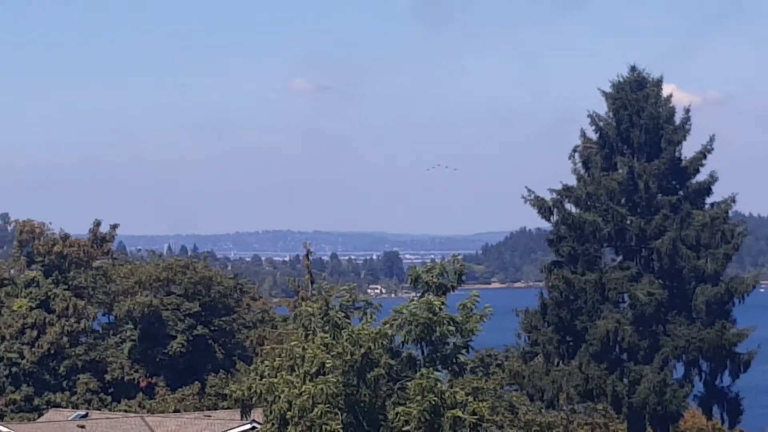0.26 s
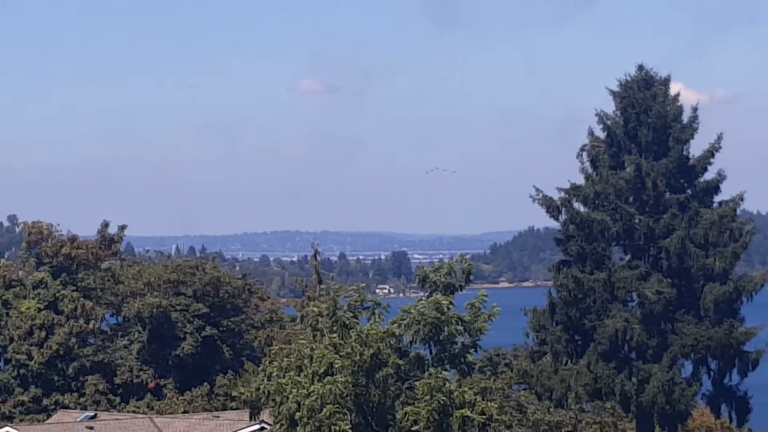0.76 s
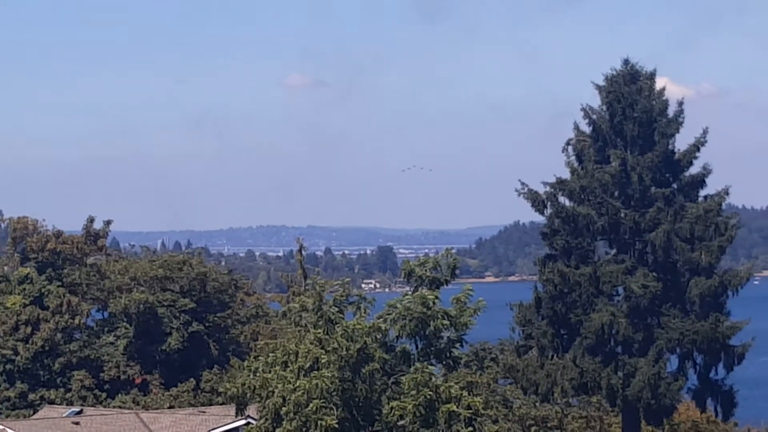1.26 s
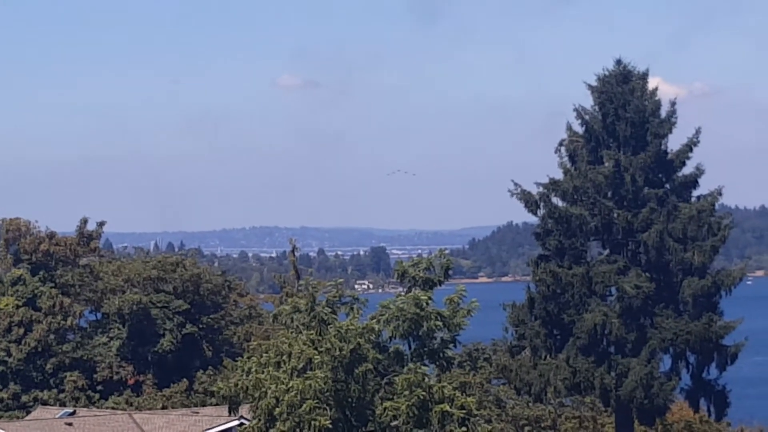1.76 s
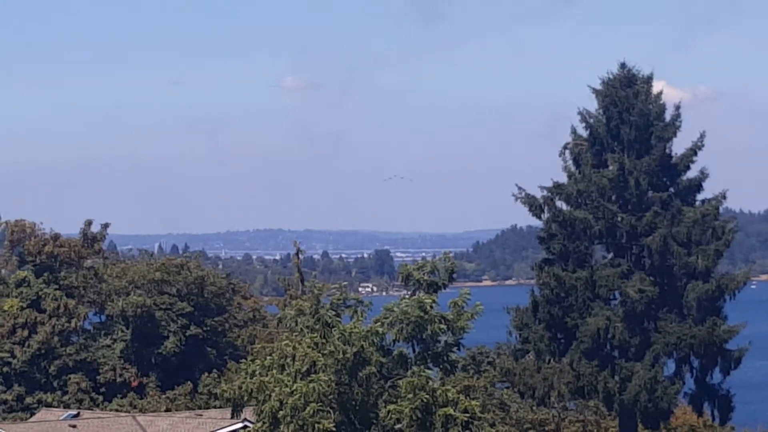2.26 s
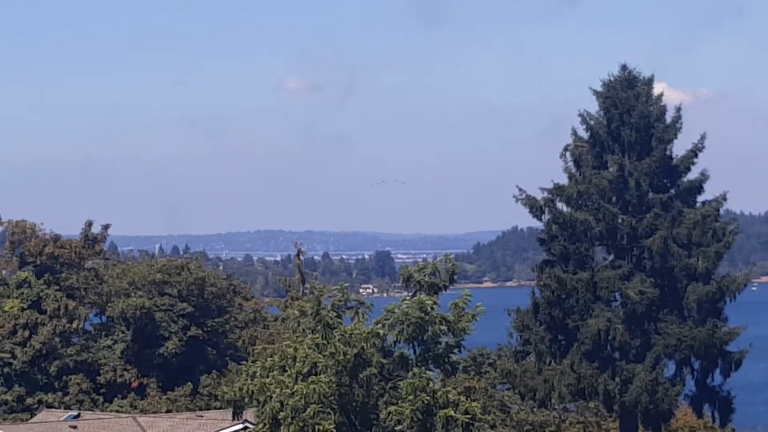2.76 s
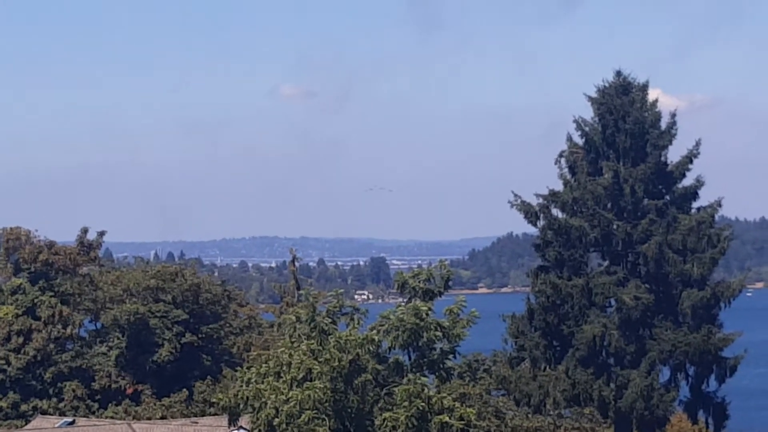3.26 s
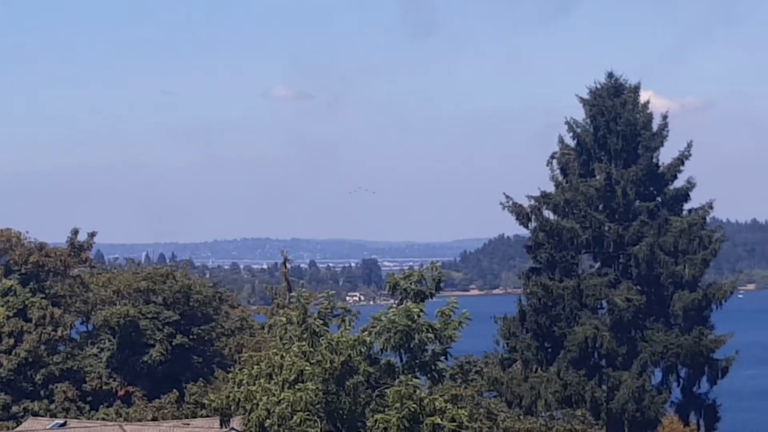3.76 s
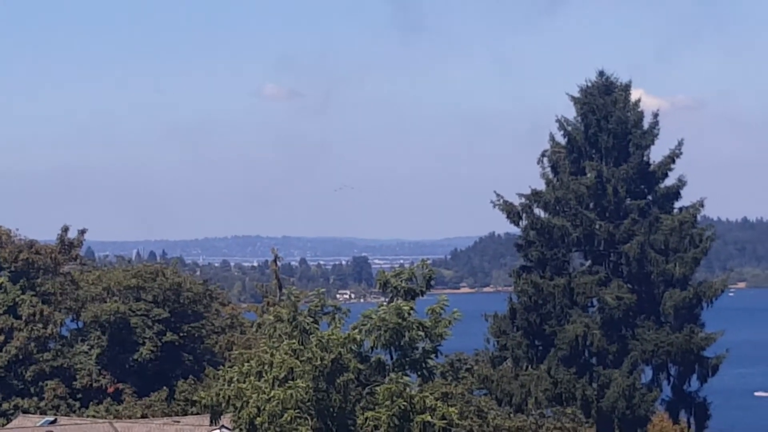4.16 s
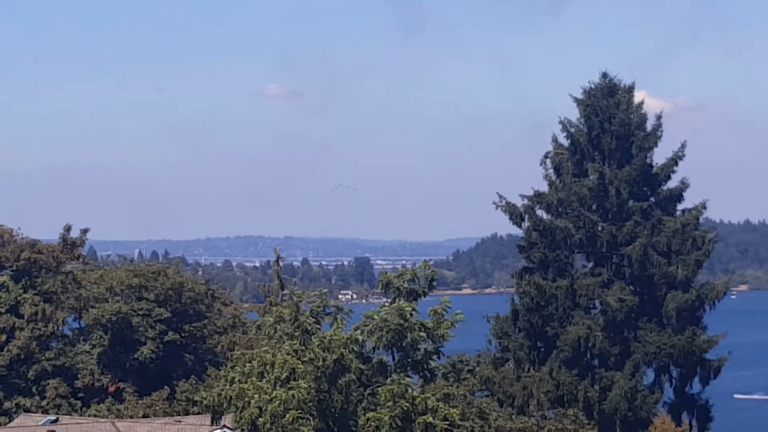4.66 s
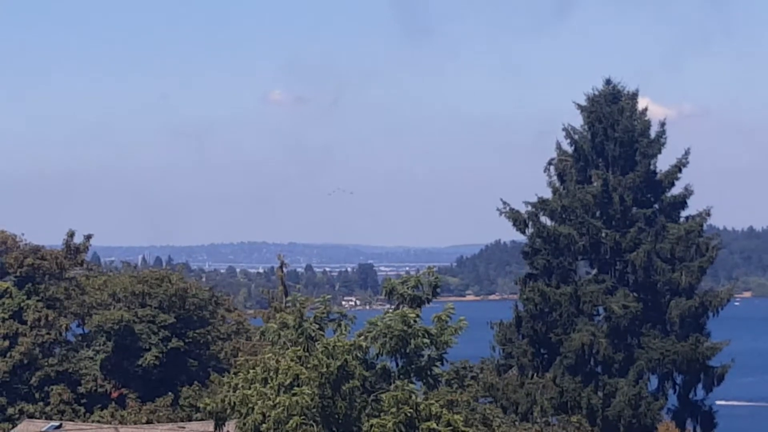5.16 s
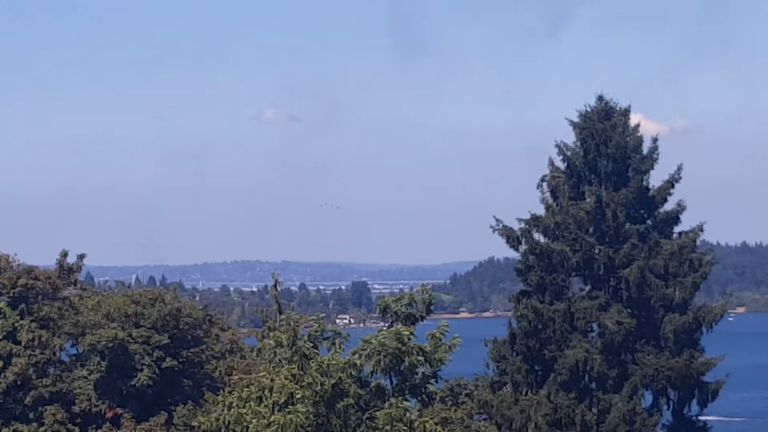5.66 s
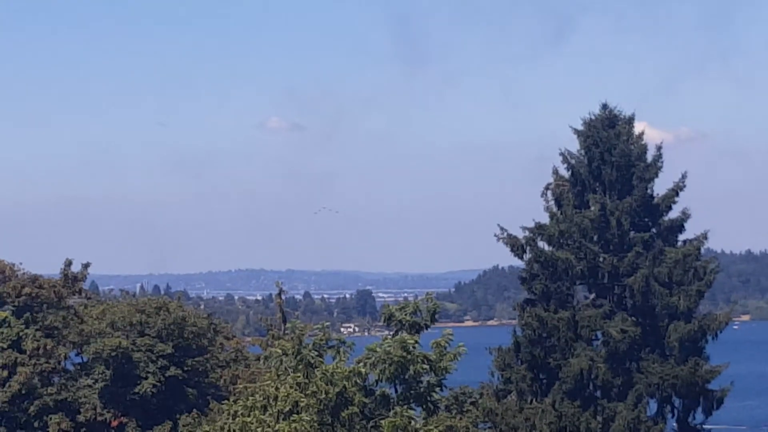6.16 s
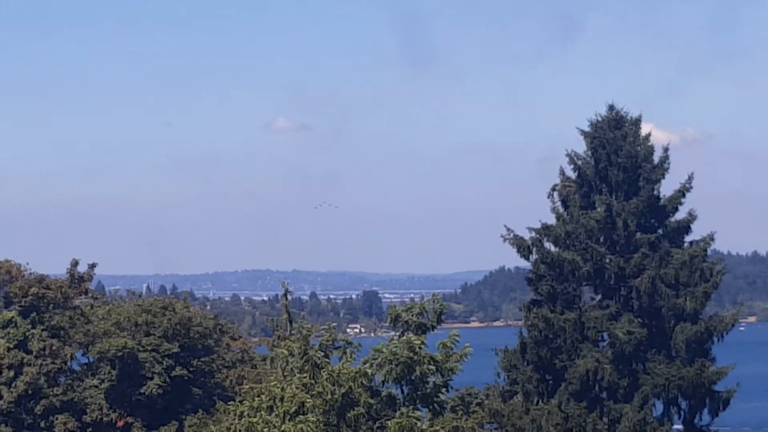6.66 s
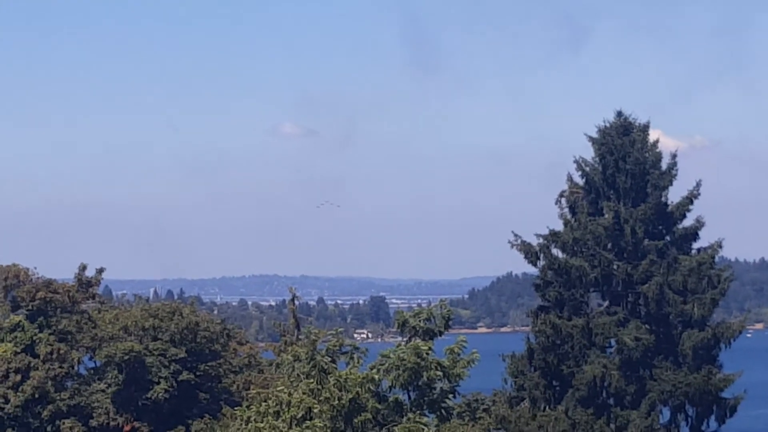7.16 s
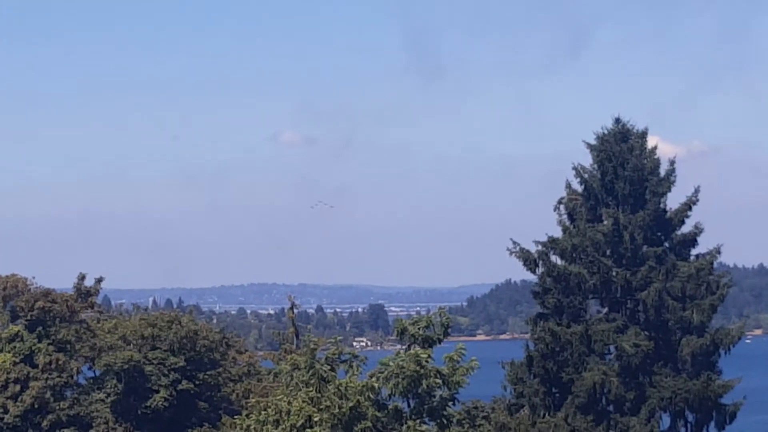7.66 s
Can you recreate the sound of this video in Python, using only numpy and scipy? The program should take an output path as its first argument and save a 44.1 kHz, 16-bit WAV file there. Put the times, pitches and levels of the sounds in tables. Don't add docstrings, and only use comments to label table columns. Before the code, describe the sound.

Several jets draw away over a lake, their deep, broad roar loudest at the start, then rumbling, swelling unevenly and fading dull. Around two seconds a soft breeze hisses through leaves, dying by seven. Tiny twig ticks follow from five seconds, and a short dry wooden creak comes near the end. Open outdoor stereo from a phone on a deck, the jets far and the foliage close.

```python
import sys
import numpy as np
from scipy import signal
from scipy.fft import rfft, irfft, next_fast_len
from scipy.io import wavfile
from scipy.ndimage import uniform_filter1d, map_coordinates

SR = 44100
rng = np.random.default_rng(int(sys.argv[2]) if len(sys.argv) > 2 else 0)


def master(y):
    cut = np.clip(np.atleast_2d(y).T, -1, 1)
    pcm = np.round(cut * 32767)
    wavfile.write(sys.argv[1], SR, pcm.astype(np.int16))


def makeup_ratio(level_db):
    decades = np.asarray(level_db, float) / 20
    return 10 ** decades


N = 347949
FRAME = 2048
LONG = next_fast_len(N + 2 * FRAME)


def along(hz, table, axis=1):
    table = np.array(table, float)
    return np.interp(np.log(hz + 1), np.log(table[:, 0]), table[:, axis])


def noise_frames():
    hz, s, noise = signal.stft(rng.standard_normal(LONG), SR, nperseg=FRAME, noverlap=FRAME * 3 // 4)
    return hz, s - FRAME / SR, noise


def sound(spectrum):
    return signal.istft(spectrum, SR, nperseg=FRAME, noverlap=FRAME * 3 // 4)[1][..., :LONG]


def patches(hz, s, octaves, rate):
    grid = rng.standard_normal((200, 400))
    cell = np.meshgrid(np.log2(hz / 20 + 1) / octaves, (s + 1) * rate, indexing="ij")
    return map_coordinates(grid, cell, order=3, mode="wrap")


def per_hz(colour, hz, lo_hz, hi_hz):
    gain = makeup_ratio(along(hz, colour))
    inside = (hz >= lo_hz) & (hz < hi_hz)
    return gain / np.sqrt(np.sum(gain[inside] ** 2) / len(hz))


def band(x, lo_hz, hi_hz):
    return signal.sosfilt(signal.butter(4, [lo_hz, min(hi_hz, 16000)], "band", fs=SR, output="sos"), x)


def add(out, s, burst, db, pan_db):
    i = int(s * SR)
    out[:, i:i + len(burst)] += burst / abs(burst).max() * makeup_ratio(db + np.array([[pan_db], [-pan_db]]) / 2)


def leaves():
    # time in seconds, rustle level in dB.
    breeze = [
        (0, -81),
        (.9, -77.5),
        (1.55, -65.5),
        (2, -62),
        (2.5, -63.5),
        (4.2, -64),
        (7.2, -77),
        (7.89, -77.5),
    ]
    # frequency in Hz, level in dB per Hz.
    leaf_colour = [(1590, -37), (2700, -9.5), (3170, -6.5), (4710, -6.5), (6750, -4), (7940, 1),
                   (9670, -15.5), (12500, -10.5), (14200, -12.5), (15600, -20)]
    # frequency in Hz, level in dB per Hz.
    self_colour = [(1530, -24.5), (2600, 3), (3300, -1), (4590, -3.5), (5420, -3), (8370, -11),
                   (10200, -15.5), (15600, -11.5)]
    self_db = -70.5
    out = []
    for port_db in (.5, -.5):
        hz, s, rustle = noise_frames()
        gust_db = np.interp(s, *np.transpose(breeze)) + .7 * patches(hz, s, 1.2, 10.0) + 4.13
        hiss = per_hz(leaf_colour, hz, 2800, 17000)[:, None] * makeup_ratio(gust_db + port_db) * rustle
        own = per_hz(self_colour, hz, 2700, 15000)[:, None] * makeup_ratio(self_db) * noise_frames()[2]
        out.append(sound(hiss + own))
    return np.array(out)


def ticks():
    # start in seconds, peak level in dB, left minus right in dB, centre in Hz.
    snaps = [
        (5.024, -51, 4, 4800),
        (5.238, -58, -12, 10300),
        (5.566, -53, 4.5, 3830),
        (5.577, -63, 6, 12000),
        (5.806, -59, 1.0, 4500),
        (6.028, -58, -6, 6430),
        (6.866, -58, -1, 6500),
        (7.618, -60, -0.5, 6500),
    ]
    width_hz, t60_s, attack_s = 5000, .035, .0018
    out, t = np.zeros((2, N)), np.arange(2000) / SR
    for s, db, pan_db, hz in snaps:
        snap = rng.standard_normal(len(t)) * 1000 ** (-t / t60_s) * np.minimum(t / attack_s, 1)
        snap = band(snap, max(hz - width_hz / 2, 1500), hz + width_hz / 2)
        add(out, s, snap, db, pan_db)
    return out


def creak():
    # start in seconds, peak level in dB, left minus right in dB.
    slips = [
        (7.29, -40, 12),
        (7.2890, -41, -12),
        (7.2908, -40, 3),
        (7.295, -38, -21),
        (7.2995, -39, 10),
        (7.3063, -53, 0.5),
        (7.3126, -46.5, 0.5),
        (7.315, -47, -4),
        (7.3244, -53, 2),
        (7.3354, -55, -8),
    ]
    # frequency in Hz, level in dB, T60 in seconds.
    board = [(1930, 7, 0.023), (2460, 3, 0.013), (4450, -12, 0.008), (6350, -7, 0.01)]
    push_t60_s, scrape_t60_s, grit = .002, .014, .4
    out, t = np.zeros((2, N)), np.arange(3000) / SR
    ring = sum(makeup_ratio(db) * np.sin(2 * np.pi * hz * t) * 1000 ** (-t / t60) for hz, db, t60 in board)
    for s, db, pan_db in slips:
        push = rng.standard_normal(len(t)) * 1000 ** (-t / push_t60_s)
        scrape = rng.standard_normal(len(t)) * 1000 ** (-t / scrape_t60_s)
        rung = signal.fftconvolve(push, ring)[:len(t)]
        add(out, s, band(rung / abs(rung).max() + grit * scrape, 1750, 7000), db, pan_db)
    return out


def crest(hz, at_hz, rest_hz, width_hz, top_db, lean_db):
    away = (hz - rest_hz) / width_hz
    lean = (at_hz - rest_hz) / width_hz * away * np.exp(-(away / 2) ** 2)
    return top_db * np.exp(-((hz - at_hz) / width_hz) ** 2) + lean_db * lean


def lifts(rows, hz, s, octaves):
    at_s, at_hz, db, half_s = np.transpose(rows)
    in_pitch = np.exp(-(np.log2((hz[:, None] + 1) / at_hz) / octaves) ** 2)
    in_time = np.exp(-((s[:, None] - at_s) / half_s) ** 2)
    return in_pitch @ (db * in_time).T


def swells(hz, s):
    # time in seconds, roar in dB, lake echo crest in Hz, hill echo crest in Hz.
    flight = [(0, -24, 545, 258.5), (.6, -26, 538, 253.4), (1.2, -25.5, 524, 251), (2, -27, 524, 228.7),
              (2.5, -30.5, 540, 247.6), (3.2, -31, 509, 267.6), (4, -33, 528, 248), (4.5, -32, 476, 248),
              (5, -32.5, 525, 262.5), (5.5, -31, 510, 281.5), (6.2, -32, 527, 270), (7, -34.5, 530, 245),
              (7.89, -37.5, 527, 254.3)]
    # frequency in Hz, level at the start in dB, change in dB per second.
    path = [(41, 21.5, -0.25), (84, 23.5, -1.4), (141, 24.5, -0.55), (245, 29.5, -0.66), (344, 29.5, 0.23),
            (580, 33, -0.0831), (1125, 26.5, -0.4342), (2220, 24, -0.86)]
    # time in seconds, centre in Hz, lift in dB,
    # half length in seconds.
    far_echoes = [(0.1, 109, 2, 0.73), (1.5, 200, -3.5, 0.36), (2.2, 150, 2, 0.35), (2.3, 251, -4, 0.39),
                  (3.6, 84.7, 9, 0.91), (4.5, 306, 5.5, 0.68), (4.7, 111.4, 1.5, 0.17), (3, 74, -3.5, .3),
                  (6.2, 200, -1, 0.18), (5.1, 85.5, 8.5, 1.1), (5.2, 289, 5, 0.48)]
    # time in seconds, centre in Hz, lift in dB, half length in seconds.
    rumble_swells = [(0.31, 210.7, 0.5, 0.067), (0.38, 109, 6.5, 0.044), (0.55, 151.8, -12.5, 0.049),
                     (0.8, 248, 2.5, 0.21), (1.07, 122, -15.5, 0.046), (1.25, 126.6, 6, 0.072),
                     (1.57, 126, 7.5, 0.032), (1.64, 77.3, -11.5, 0.26), (1.8, 302, 14, 0.017),
                     (2.89, 173.4, -8.5, 0.1), (3.2, 214, -8.5, 0.051), (3.41, 89.2, 6, 0.044),
                     (3.54, 91, -15.5, 0.077), (3.93, 147, 6, 0.09), (4.17, 218, -9.5, 0.035),
                     (4.42, 108, 7.5, 0.068), (4.54, 90, -9, 0.036), (4.84, 75.3, -7, 0.097),
                     (5.13, 91.7, 9, 0.055), (5.13, 179, 4.5, 0.2), (5.31, 306, 5.5, 0.16),
                     (5.68, 248, -2.5, 0.13), (5.89, 217.5, 12.5, 0.022), (6.08, 88, -5, 0.24),
                     (6.09, 150, -6.5, 0.11), (6.1, 299, -2.5, 0.22), (6.39, 149.7, 5, 0.094),
                     (6.68, 263, 4.5, 0.06), (6.71, 130.7, 5.5, 0.11), (7.75, 155, 3.5, 0.16)]
    # time in seconds, lift in dB, half length in seconds.
    surges = [(0.194, 0.5, 0.15), (0.424, 2.5, 0.045), (0.68, -2.5, 0.097), (1.281, 2.5, 0.076),
              (1.688, 0, 0.087), (1.85, 3, 0.032), (2.285, 6, 0.036), (2.527, 0, 0.037),
              (2.688, -2.5, 0.04), (3.217, -3, 0.046), (3.426, -1, 0.08), (3.606, 1.5, 0.033),
              (3.74, -3, 0.05), (3.955, -2, 0.055), (4.411, 1.6, 0.27), (5.271, 5.5, 0.015),
              (5.543, -4, 0.04), (6.01, 2.5, 0.036), (6.234, -6.5, 0.027), (6.493, -2, 0.031),
              (6.63, 4.5, 0.05), (7.029, -2, 0.09), (7.255, 1.5, 0.049), (7.586, -4, 0.076)]
    surge_hz = 540

    flight_s, *courses = np.transpose(flight)
    roar_db, lake_hz, hill_hz = (np.interp(s, flight_s, course) for course in courses)
    lake_hz = lake_hz + 18 * patches(np.zeros(1), s, 1, 9)[0]
    hill_hz = hill_hz + 7.6 * patches(np.zeros(1), s, 1, 9)[0]
    lake_db = crest(hz[:, None], lake_hz, 535.6, 55, 2.64, 4.1) - 1.2
    hill_db = crest(hz[:, None], hill_hz, 243.7, 44, 3.56, 4.9)

    path_db = roar_db + along(hz, path)[:, None] + along(hz, path, axis=2)[:, None] * s
    swell_db = lifts(far_echoes, hz, s, octaves=0.54) + 1.28 * lifts(rumble_swells, hz, s, octaves=0.31)
    surge_rows = [(at_s, surge_hz, db, half_s) for at_s, db, half_s in surges]
    swell_db = swell_db + 1.49 * lifts(surge_rows, hz, s, octaves=0.41)

    depth = 1 / (1 + (hz[:, None] / 1200) ** 2)
    twinkle_db = depth * (2.8 * patches(hz, s, .08, 2.986) + 1.25 * patches(hz, s, 0.778, 12.0))
    twinkle_db = twinkle_db + (1 - depth) * 1.3 * patches(hz, s, .15, 8.0)
    return makeup_ratio(path_db + swell_db + twinkle_db + lake_db + hill_db), depth


def jets():
    # frequency in Hz, level in dB per Hz.
    jet_colour = [(15, -58), (25, -25), (43, -28.5), (78, -0.5), (97, 5), (146, 5), (215, -5), (258, -5),
                  (350, -21), (525, -11.5), (788, -20.5), (909, -19), (1160, -26.5), (1420, -24.5),
                  (3200, -55.5), (4160, -91), (7040, -120)]
    # frequency in Hz, likeness 0-1, right port lead in radians, left minus right in dB.
    ports = [(45, .925, 0, 1), (100, .992, 0, .8), (150, .98, -.08, 1.4), (215, .894, .14, 4.3),
             (268, .952, .03, 3.3), (320, .136, 1.63, 10.8), (385, .534, -2.21, -6.4),
             (450, .915, -1.06, -2.3), (550, .96, -.47, -.3), (690, .88, -1, 2.3), (790, .2, -2, 2.2),
             (870, .71, .69, .2), (1180, .2, 2.5, .6), (1600, .65, .9, 3.5)]
    # centre in Hz, width in Hz, lift in
    # dB.
    echo_dips = [(43, 8, 9.5), (228.8, 9, -4), (300, 9.1, -12), (448, 12, 2), (678, 30, 2), (720, 15, -3),
                 (793, 29, -7), (1063, 23, 2.5), (1092, 11, -1)]

    hz, s, shared = noise_frames()
    left, right = noise_frames()[2], noise_frames()[2]
    gain, depth = swells(hz, s)
    local = uniform_filter1d(uniform_filter1d(abs(shared) ** 2, size=3, axis=0), size=5, axis=1)
    shared = shared * (local / local.mean()) ** (-.3 * depth)
    lumps = makeup_ratio(0.83 * depth * patches(hz, s, 1.43, 16.0))
    shared, left, right = rfft(sound(gain * np.array([shared, lumps * left, lumps * right])))

    hz = np.arange(len(shared)) * SR / LONG
    air_db = -60 * np.log2(np.maximum(hz / 2350, 1))
    dips_db = sum(db * np.exp(-((hz - at_hz) / width_hz) ** 2) for at_hz, width_hz, db in echo_dips)
    like = along(hz, ports)
    turn = np.exp(.5j * along(hz, ports, axis=2))
    tilt = makeup_ratio(along(hz, ports, axis=3) / 2)
    together = like * abs(tilt / turn + turn / tilt) ** 2
    apart = (1 - like) * (tilt ** 2 + tilt ** -2)
    mean = np.sqrt(together + apart) / 2
    pair = np.array([tilt * (np.sqrt(like) * shared / turn + np.sqrt(1 - like) * left),
                     (np.sqrt(like) * shared * turn + np.sqrt(1 - like) * right) / tilt])
    return irfft(makeup_ratio(along(hz, jet_colour) + air_db + dips_db) / mean * pair, LONG)


def scene():
    steady = (leaves() + jets())[:, FRAME:FRAME + N]
    return steady + ticks() + creak()


def low_pass(x):
    return signal.sosfilt(signal.butter(12, 15730, fs=SR, output="sos"), x)


def record(dry):
    rounded = np.tanh(1.33 * dry) / 1.283
    return low_pass(rounded)


dry = scene()
out = record(dry)
master(out)
```